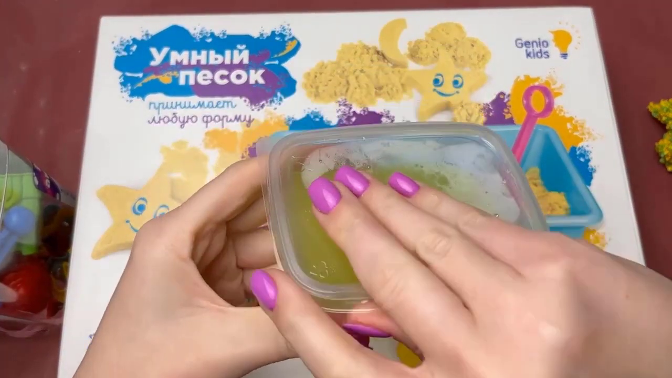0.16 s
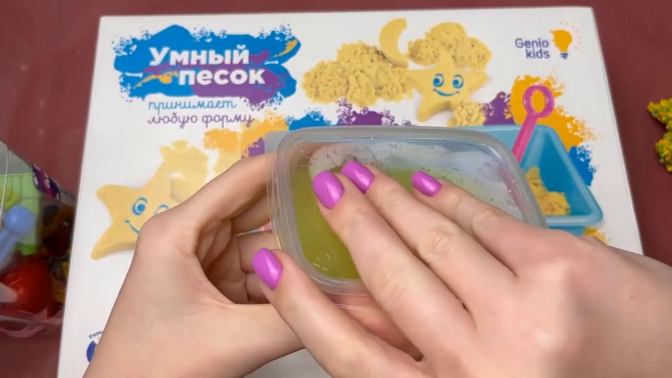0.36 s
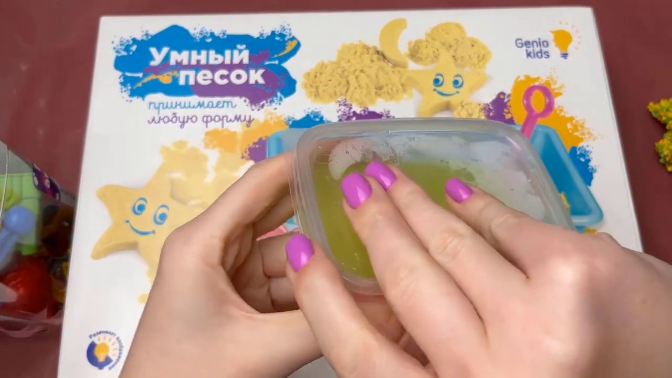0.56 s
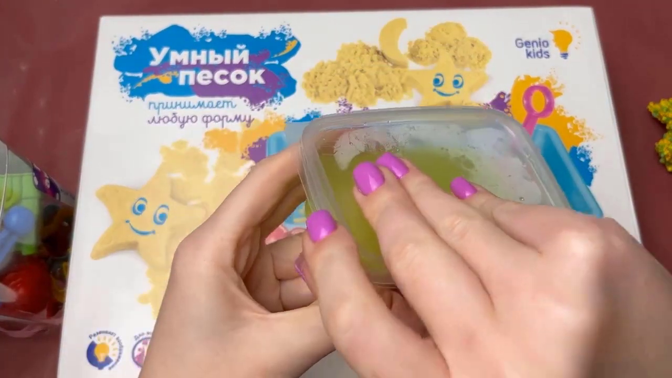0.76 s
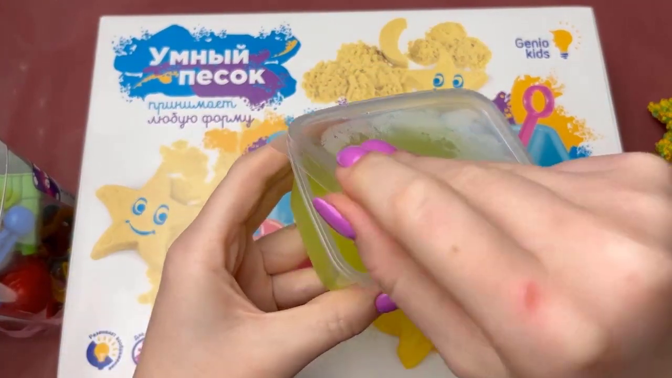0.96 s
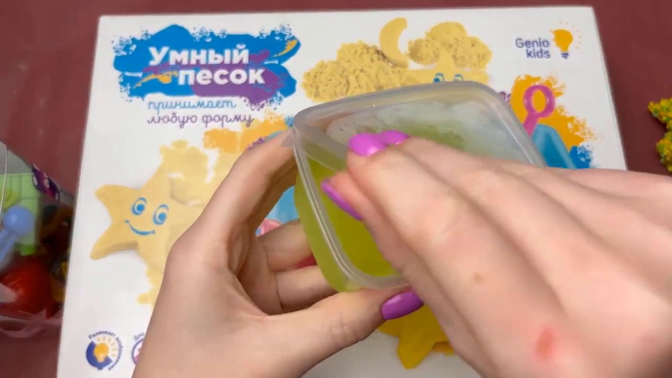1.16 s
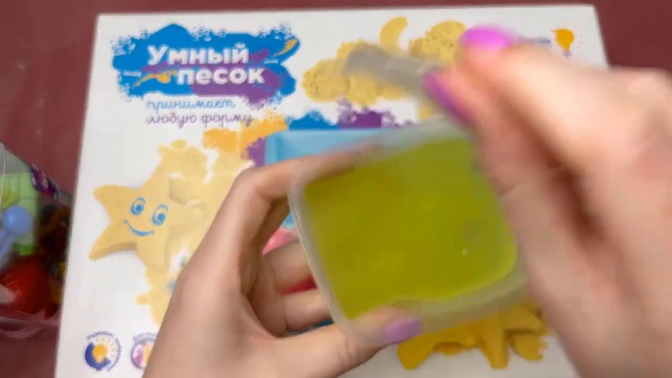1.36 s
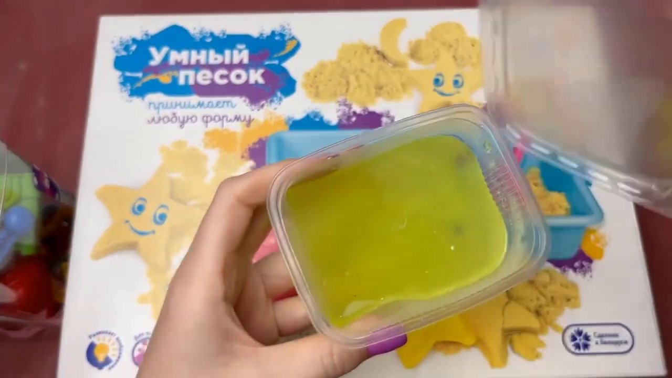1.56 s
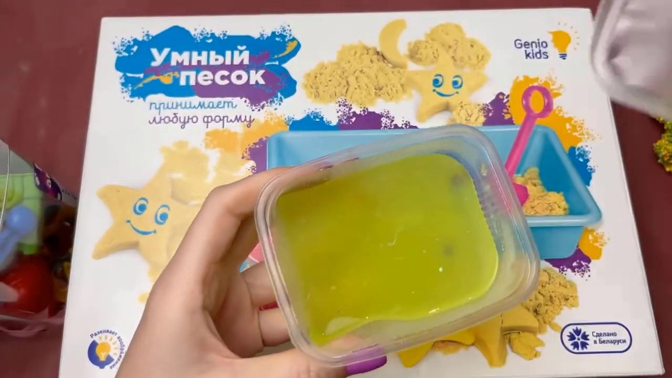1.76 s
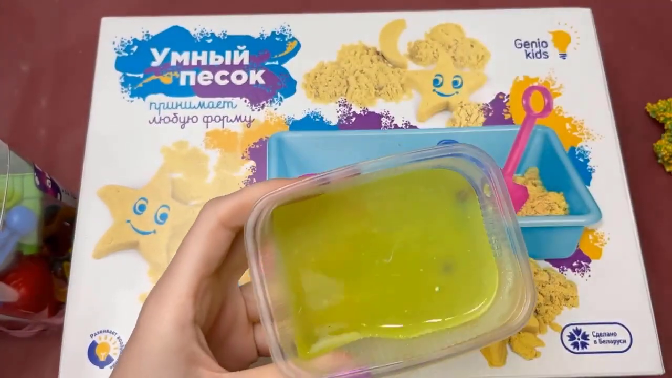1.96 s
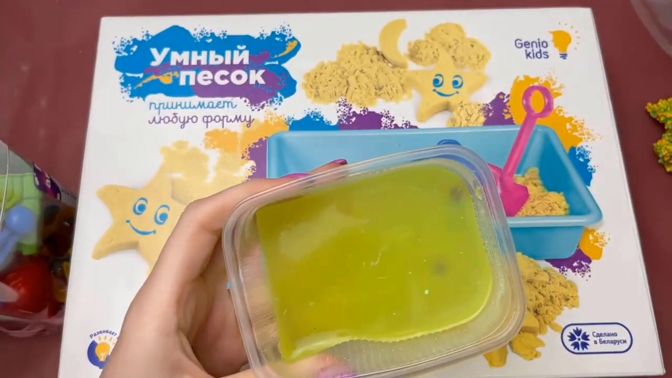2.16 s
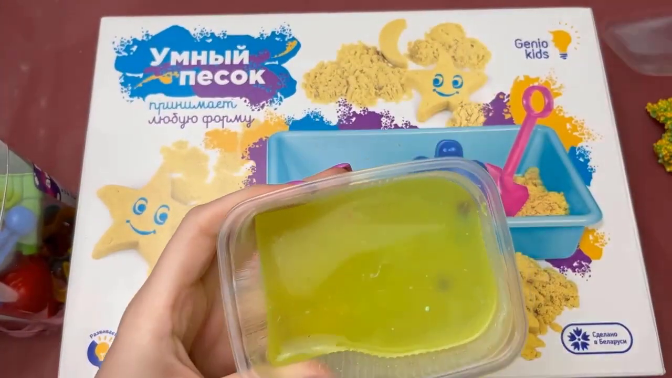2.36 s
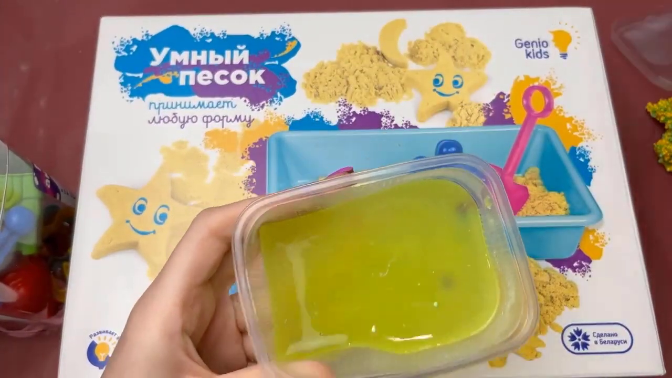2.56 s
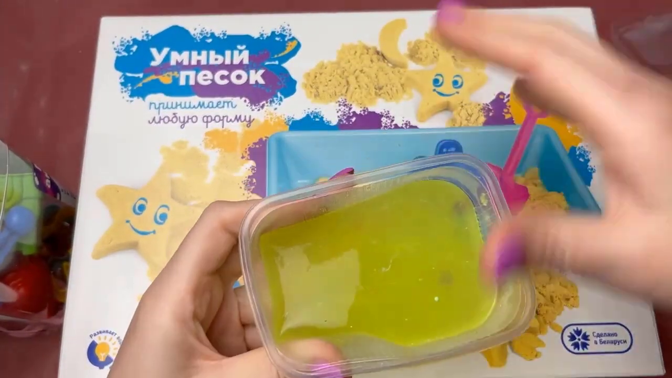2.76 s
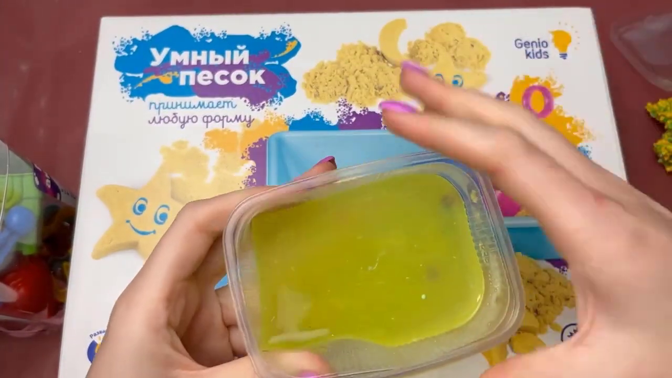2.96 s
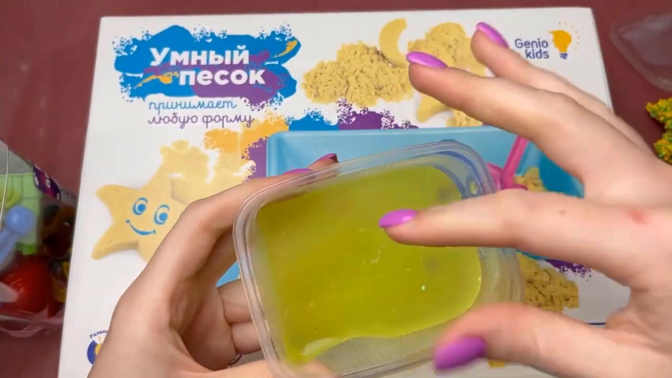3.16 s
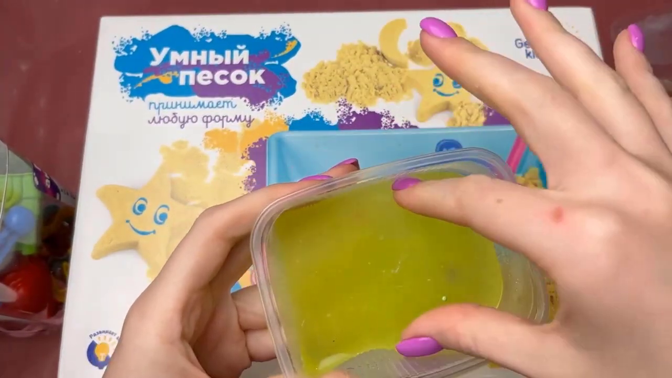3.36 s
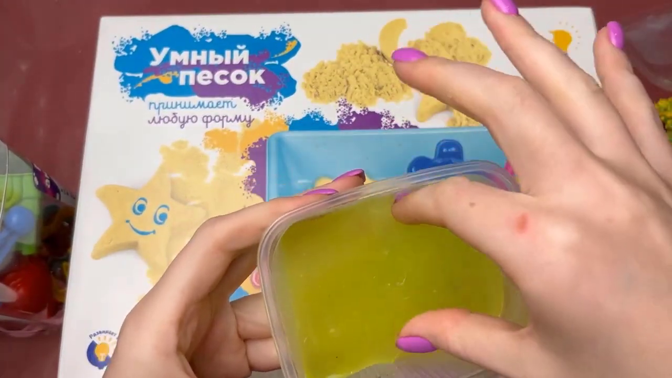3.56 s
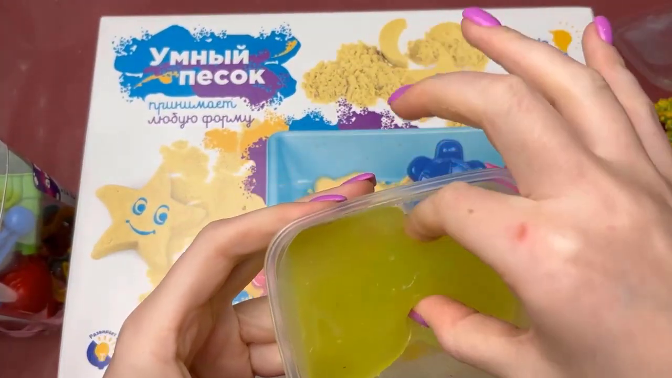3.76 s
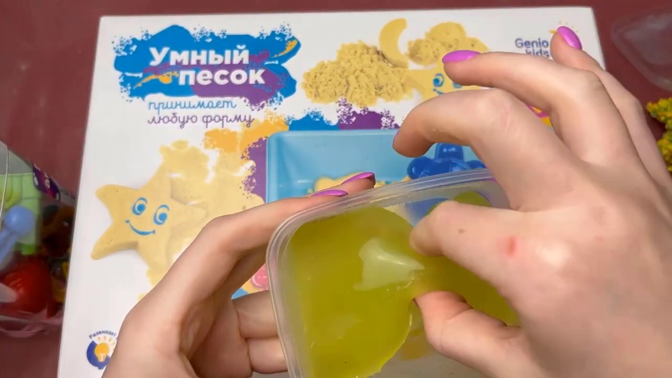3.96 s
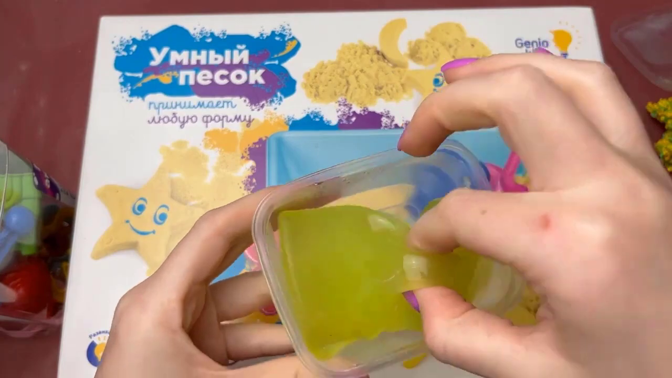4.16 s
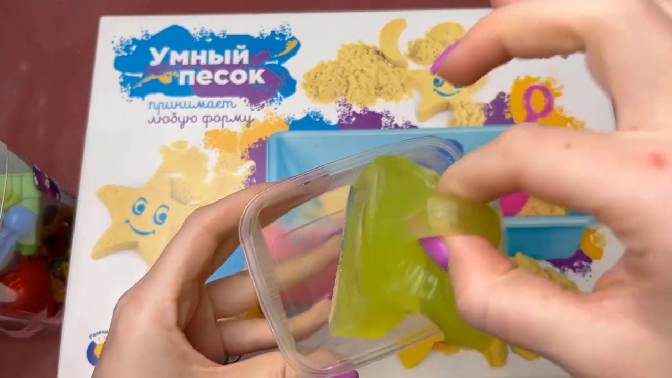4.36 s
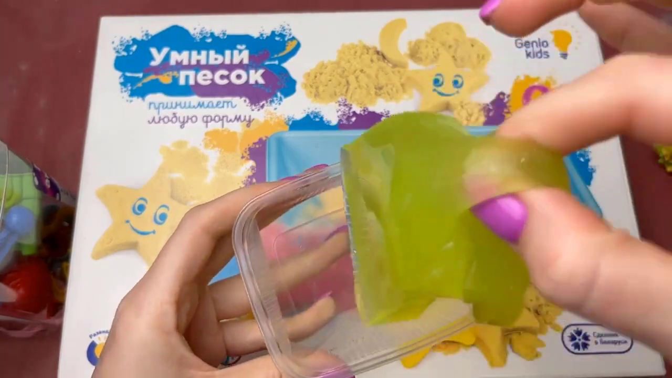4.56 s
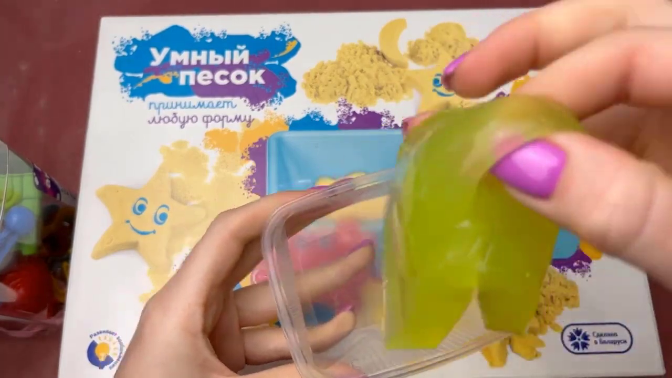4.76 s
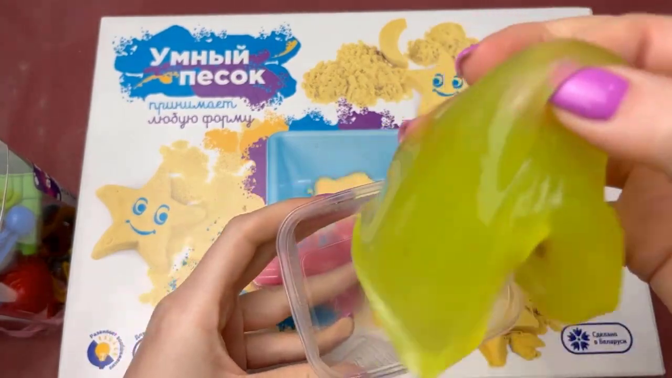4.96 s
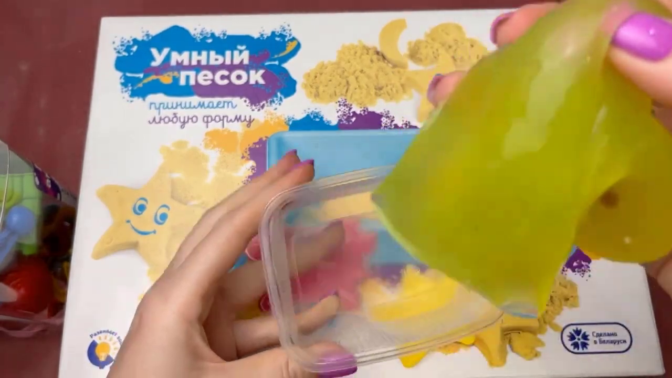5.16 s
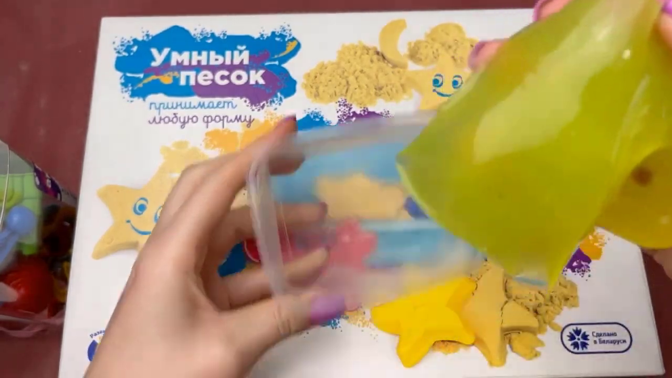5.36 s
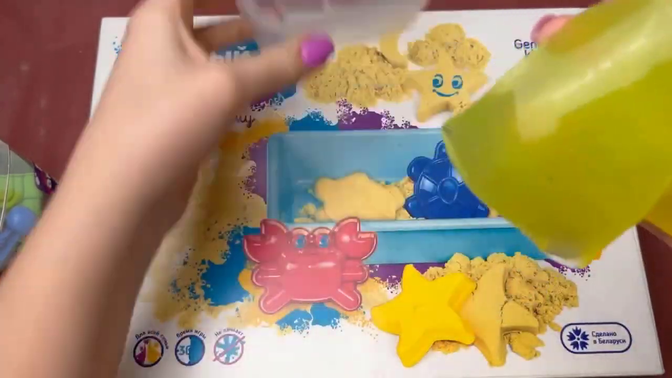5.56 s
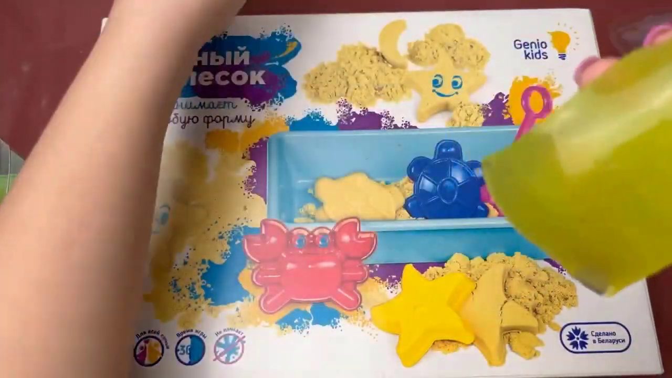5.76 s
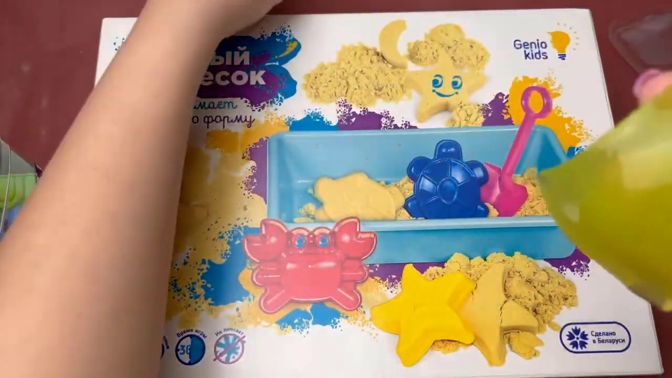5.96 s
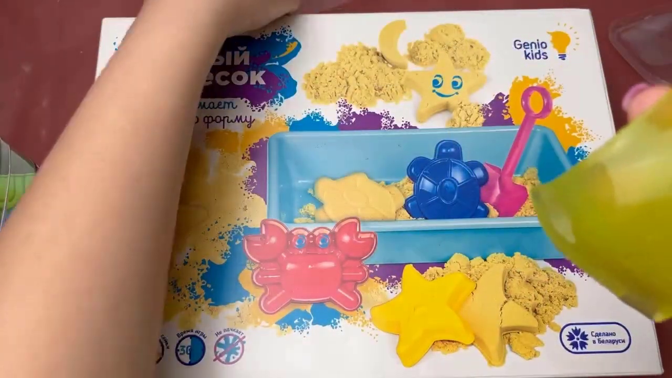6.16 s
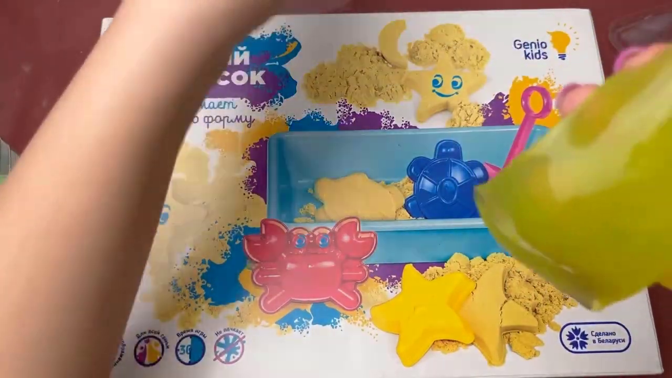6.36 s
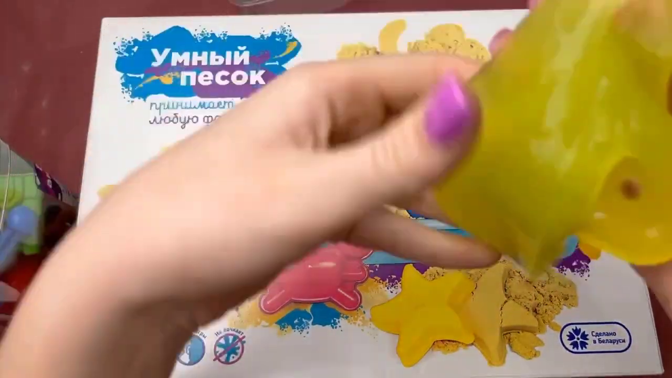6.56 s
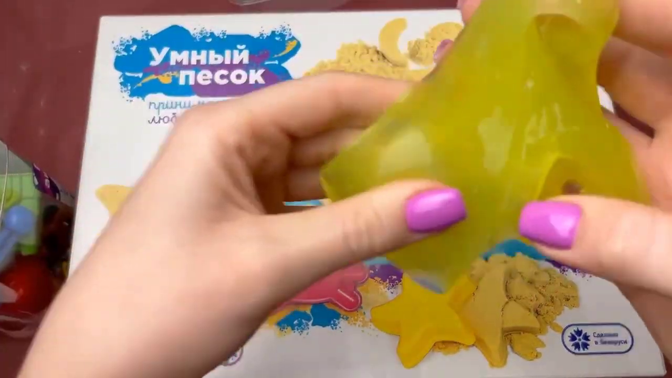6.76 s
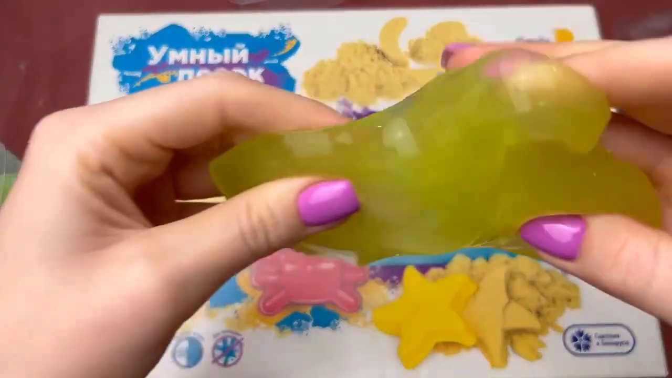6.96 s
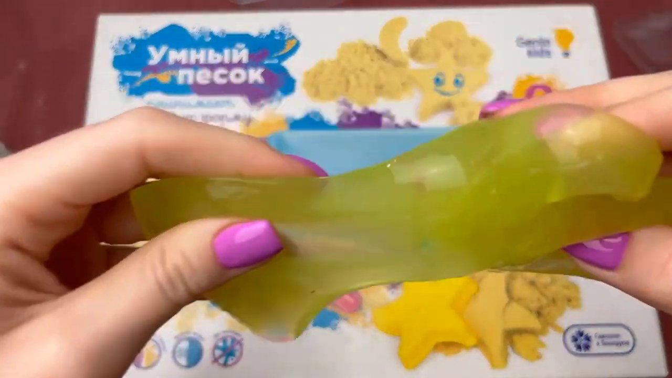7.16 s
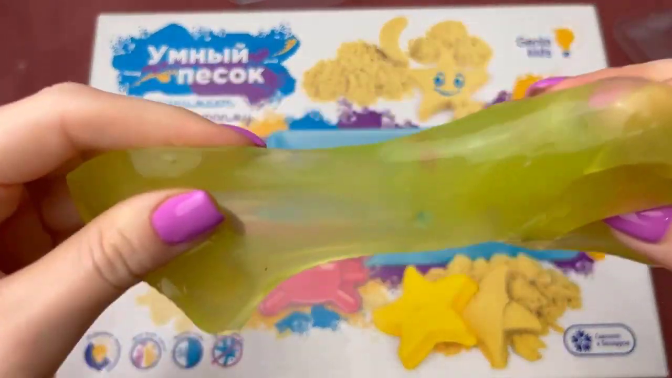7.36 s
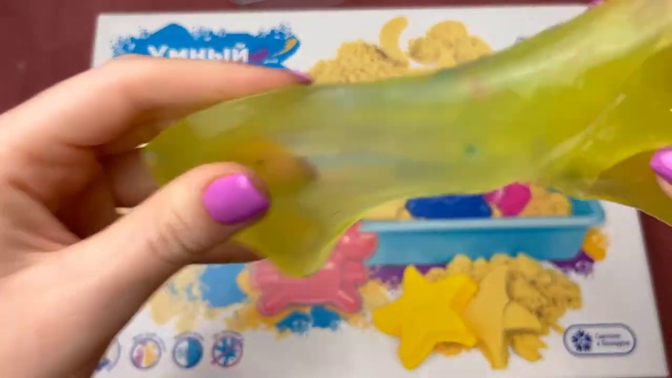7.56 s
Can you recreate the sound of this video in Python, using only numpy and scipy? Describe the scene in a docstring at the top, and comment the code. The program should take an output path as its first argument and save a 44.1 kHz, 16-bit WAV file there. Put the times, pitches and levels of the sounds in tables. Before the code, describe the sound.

A quiet furnished room hums steadily, heavy in the bass, under close phone-recorded handling of a small plastic tub. From 0.1 s the rim gives dry clicks, with a stronger one at 0.43 and faint ticks around it. A loud hollow snap lands at 0.75, then a hard cluster at 0.93-1.0, with a lesser click at 1.18. At 1.39-1.53 the lid tears free in rapid, distorting snaps, creaks and loose plastic chatter, ending with a low thump and a short scrape. A faint whine bends up and down near 1.9; the lid taps down farther off, clearest at 2.4. A barely audible tone lingers around 2.8-3.4. Jelly peels with small ticks from 3.4 to 4.6, a sharper click at 5.2 and light ones at 5.47. The tub knocks down at 6.1-6.3 with a bright clack, rattle and thump, and a soft tap at 6.48. Mostly hum remains, with minute ticks near 6.85 and 7.3.

```python
"""Under all of it hums a quiet furnished room, steady and heavy in the bass, made of shaped noise.
Hands work the lid off a small plastic tub close to a phone: the rim snaps free in steps, each a short burst
of wall tone, crack noise and low modes, and creaks between them as dense slips shaped by the tub.
Low thumps are short sine packets; a faint gliding whine, then a faint steady hum tone, are sines. The lid is
put down further off, jelly peels with small ticks, the tub is put down; the loudest snaps overload the recorder."""
import sys
import numpy as np
from scipy import signal
from scipy.fft import rfft, irfft
from scipy.io import wavfile

SR = 44100
rng = np.random.default_rng(int(sys.argv[2]) if len(sys.argv) > 2 else 0)


def dump_mix(stems):
    """Bounce the given channels to the path in sys.argv[1] as a 16-bit WAV at rate SR."""
    frames = np.atleast_2d(stems).T  # one column per channel
    limited = np.clip(frames, -1, 1)  # hard clip at full scale
    pcm = np.round(limited * 32767).astype(np.int16)
    wavfile.write(sys.argv[1], SR, pcm)


N = 335160

# Likeness of left and right. Each row: frequency in Hz, correlation from -1 to 1.
LIKENESS = [(60, 0.96), (180, 1), (550, 0.31), (1650, 0.27), (4960, -0.22), (15000, 0.18)]

# Spectrum of the room hum. Each row: frequency in Hz, relative density in dB per Hz.
HUM_SPECTRUM = [(12, -50), (20, -25.5), (37, -5.5), (102, -3.5), (126, -6), (236, -9.5), (270, -9.5),
                (384, -10.5), (608, -12), (776, -16), (1100, -16), (2150, -27), (2750, -39.5), (3600, -41),
                (5170, -33), (5920, -62), (7560, -40.5), (9400, -50), (10200, -70), (13000, -83)]
# Wavering tones in the hum. Each row: frequency in Hz, width in Hz, mean level in dB.
HUM_TONES = [(211.4, 89, -48), (229, 22, -57), (367, 29, -58.5), (523, 120, -52.5), (769, 7.1, -61),
             (3478, 210, -71)]
HUM_DB, TONE_WAVER_DB = -46, 2.2   # mean level of the broad hum; spread of the tone levels

# Strokes of plastic and jelly sliding. Each row: start of the loudest part in seconds, relative level in dB,
# rise in seconds, hold in seconds, fall in seconds, extra treble in dB. Rise and fall span 20 dB.
STROKES = [(0.098, -40, 0.028, 0.01, 0.015, 6.5), (0.385, -52.5, 0.097, 0.025, 0.076, 0),
           (0.515, -44, 0.083, 0.0075, 0.19, 13.5), (0.776, -22.5, 0.0038, 0.0007, 0.0033, -6),
           (0.921, -35, 0.063, 0.035, 0.044, 1.5), (0.968, -26, 0.0056, 0.00076, 0.013, -7.5),
           (0.989, -26, .016, 0.0091, 0.13, -6.5), (1.387, -25, 0.0057, .001, 0.013, -2.5),
           (1.446, -20, 0.036, 0.004, 0.048, -3), (1.546, -28, 0.08, .024, 0.15, 6),
           (1.796, -41.5, 0.026, .001, 0.012, 5), (2.074, -54, 0.071, 0.026, .12, 17.5),
           (2.27, -57, 0.024, .001, 0.14, 8.5), (2.48, -41.5, 0.06, 0.029, 0.13, 7.5),
           (3.007, -54, 0.065, .001, .08, 0), (3.396, -49.5, .033, 0.061, 0.076, 3),
           (3.545, -49, 0.068, 0.022, 0.078, 14), (3.872, -37, 0.022, 0.004, 0.057, -12),
           (4.166, -43.5, 0.011, 0.19, 0.055, -2), (4.336, -49, 0.0069, .006, 0.022, 6),
           (5.203, -39, 0.024, .012, 0.092, 4.5), (5.856, -56, 0.064, 0.0012, 0.064, 7),
           (6.13, -44, 0.04, 0.14, 0.11, -1), (6.245, -14.5, 0.0059, 0.0015, 0.017, -4),
           (6.337, -35, 0.24, 0.03, 0.16, -4.5), (6.54, -50.5, 0.081, 0.0017, 0.056, -2),
           (6.847, -60, 0.022, 0.14, 0.034, 4.5), (7.31, -47.5, 0.026, 0.022, 0.043, -1.5)]
# Spectrum of sliding. Each row: frequency in Hz, relative density in dB per Hz.
SLIDE_SPECTRUM = [(290, -33), (500, -2), (4720, -15.5), (5900, -14.5), (6590, -19.5), (7900, -22.5),
                  (9480, -24.5), (10000, -44), (11500, -27.5), (14000, -103.5)]
TREBLE_HZ = 6000   # where the treble of a stroke begins

# The rim slips free in steps. Each row: start in seconds, level in dB, settled wall pitch in Hz, length in ms,
# then in dB relative to the level: crack, hollow modes, room send.
RIM_SNAPS = [(0.101, -13, 1190, 1.15, -41, -14, -28), (0.292, -47, 826, 2.5, -14, 4, -21),
             (0.342, -30.5, 1280, 2.6, -16, 2.5, -19.5), (0.216, -50.5, 1410, 2.3, 0.5, -15, -16),
             (0.306, -42.5, 1400, 2.5, -12, -10, -18), (0.392, -39, 1000, 3, -8, 0, -14),
             (0.434, -9, 1476, 1.4, -44, -14.5, -22.5), (0.435, -16, 1080, 4.5, -56, 11, -17.5),
             (0.532, -37, 1090, 3.1, -9, 1.5, -13), (0.585, -39.5, 1020, 11, -5.5, -24, -12),
             (0.743, -21, 1100, 3, -10.5, 1, -22), (0.7455, -1, 1080, 3, -13, 0, -14.5),
             (0.746, 1, 636, 5.2, -31.5, -3.5, -14.5), (0.934, -14.5, 1410, 1.8, -19, -6.5, -17),
             (0.939, -10, 1370, 1.7, -31.5, -11.5, -14), (0.968, -22.5, 950, 2.5, -11, -9.5, -19),
             (0.972, 5.5, 1667, 1.37, -25.5, -32.5, -15.5), (0.991, 0, 1130, 3.1, -25, -5.5, -17.5),
             (1.003, 1, 1236, 2.64, -36.5, -17, -33.5), (1.181, -19.5, 1307, 3, -26.5, -8.5, -15),
             (1.387, -16.5, 1101, 2.5, -14, -7.5, -20.5), (1.39, 4.5, 1086, 3.7, -12, -5, -10.5),
             (1.394, -13, 1010, 2.3, -20, -12, -24.5), (1.401, -6, 930, 6.8, -21, -12, -24.5),
             (1.411, -17.5, 1380, 4, -9, -12, -13.5), (1.421, 0, 1420, 5.5, -12, -10, -22),
             (1.456, 3.5, 1395, 2.9, -9.5, -21.5, -16.5), (1.4603, 2, 1405, 3.2, -13.5, -17, -20),
             (1.466, -7.5, 1430, 4.2, -10, -13.5, -24.5), (1.464, -6.5, 1500, 2.5, -9.5, -20.5, -22.5),
             (1.486, -13.5, 1347, 3.5, -22, -23, -20.5), (1.496, -16.5, 1358, 3.4, -21.5, -25.5, -8.5),
             (1.506, -20.5, 1387, 4.8, -20, -15.5, -21.5), (1.517, -19, 1360, 4, -13, -17.5, -22),
             (1.527, 1.5, 1106, 3.35, -7.5, -4, -19), (1.533, -15, 1149, 3.7, -0.5, -11.5, -22)]
RIM_BODY_DB, RIM_THUMP_DB = -21, -27.5
# The near corner is worked first, then the lid tears off; pan is left over right.
RIM_PAN_DB, LID_FREE_S, FREE_PAN_DB = -1.5, 1.3, 3
# Lid and tub are put down and rock. Each row: start in seconds, level in dB, settled wall pitch in Hz,
# length in ms, then in dB relative to the level: crack, hollow modes, body modes, room send.
KNOCKS = [(1.929, -33.5, 1399, 3.5, -3.5, 6.5, -15, -14), (2.392, -16, 1868, 0.9, -5.5, -12, -19, -9.5),
          (2.679, -37.5, 1350, 4, -39, -6.5, -15.5, -8), (6.064, -24.5, 830, 5.5, -61, -0.5, -19, -6),
          (6.135, -13.5, 855, 8.7, -10, -1, -1, -7), (6.245, -17.5, 1042, 0.71, 0.5, 3, 5, -15.5),
          (6.257, -19, 917, 5.5, -30.5, 5, -32, -7), (6.285, -32, 1032, 1.3, -31, 6, 3.5, -1.5),
          (6.476, -31.5, 1340, 2.7, -16.5, 0, -3, -8.5)]
KNOCK_THUMP_DB, KNOCK_PAN_DB = -17, -2.5
# Jelly lets go of the wall. Each row: start in seconds, level in dB, settled wall pitch in Hz, length in ms,
# then in dB relative to the level: crack, hollow modes, room send.
TICKS = [(3.393, -18.5, 1326, 1.83, -30, -3, -16), (3.46, -21, 1350, 2.8, -18, -4.5, -16.5),
         (3.658, -29.5, 1450, 3.3, -17.5, -19, -16.5), (3.868, -30.5, 1438, 2.8, -22, -1, -18),
         (3.874, -30, 1230, 4.5, -10.5, -8, -17.5), (4.098, -35.5, 1470, 2.7, -15.5, -1, -3),
         (4.137, -18.5, 1437, 2, -8.5, -2, -16.5), (4.165, -34, 1180, 3.2, -10, -12, -9),
         (4.227, -39, 1120, 2.9, -10, -12, -14), (4.297, -40, 1690, 2, -6, -14, -6),
         (4.317, -35, 1436, 2.5, -12, -10, -17), (4.198, -33.5, 1154, 4.8, -10, -7.5, -13),
         (4.262, -27, 1222, 6.2, -12, -24, -8), (4.272, -31.5, 1470, 4.8, -8.5, -21, -11),
         (4.345, -32.5, 1440, 6, -3, -18, -21), (4.611, -36, 1430, 2.5, -18, -6, -7),
         (5.192, -36, 1696, 2.7, -17, -18, -5), (5.205, -8.5, 1445, 1.34, -24, -7.5, -22),
         (5.224, -36, 1243, 2.6, -33.5, 7, -16), (5.468, -20.5, 1802, 3.1, -12, -25, -19.5),
         (5.47, -23.5, 1410, 3.9, -20, -20, -20), (6.845, -60, 7200, 4.3, -20, -34, -19),
         (7.291, -48, 6760, 1.2, -5, -36, -10), (7.322, -61, 7800, 1.3, -14.5, -30.5, -13)]
TICK_BODY_BELOW_DB, TICK_THUMP_DB = 13, -45   # the body rings below the hollow
# Modes of the flexed wall. Each row: multiple of the pitch, relative level in dB.
WALL_MODES = [(0.999, 1), (1.45, -12), (2.1, -17.5)]
# Spectrum of the crack. Each row: frequency in Hz, relative density in dB per Hz.
CRACK_SPECTRUM = [(350, -16), (600, -7.5), (2640, -6), (3060, -8), (4790, -14), (5960, -9), (6730, -11),
                  (9070, -19), (10100, -20.5), (11700, -22.5), (15400, -95.5)]
# Low modes of the tub in three clusters: hollow, body, thump.
# Each row: settled frequency in Hz, level within the cluster in dB, 60 dB decay time in seconds.
TUB_MODES = [
    [(484, -8.5, 0.022), (548, 3, 0.022), (630.4, 4, 0.02), (690, -9, 0.018), (1007, -1, 0.015)],
    [(223, -1, 0.068), (266.5, -4.5, 0.1), (338.2, -7, 0.18), (362.1, 3, 0.052), (446, -11, 0.033)],
    [(83.6, -11.5, 0.099), (123, -1, 0.12)],
]
GRIP_DB, GRIP_SHIFT = 2.2, .02   # spread of mode strength and relative pitch from grip to grip

# Decay of the room. Each row: frequency in Hz, 60 dB decay time in seconds (0.03 at the least).
ROOM_T60 = [(100, 1), (400, 0.048), (1200, 0.45), (3000, 0.52), (8000, 0.25), (14000, 0.058)]
# Colour of the room tail. Each row: frequency in Hz, gain in dB.
ROOM_COLOUR = [(100, -1.5), (500, 4), (800, -4), (1100, -3), (1500, -2.5), (1950, -5), (2400, -4),
               (2900, -4), (4000, -1.5), (4700, 2), (6200, -12), (8000, 2.5), (12000, -4)]
# Phase gap of the microphone ports. Each row: frequency in Hz, lead of the left port in radians.
PORT_PHASE = [(200, 0), (450, -.5), (900, -.75), (1400, -.2), (1800, -.1), (2670, 2.6), (4130, .4),
              (5000, .7), (5600, 3.1), (6550, 3.3), (7320, 6.3), (8870, 6.5), (9650, 9.5), (10900, 9.4),
              (12100, 13), (15200, 19)]

# Bursts of chatter. Each row: start of the loudest part in seconds, level in dB,
# rise in seconds, hold in seconds, fall in seconds. Rise and fall span 20 dB.
CHATTER = [(0.445, -39, 0.012, 0.013, 0.027), (1.005, -41, 0.013, 0.012, 0.089),
           (1.414, -21, 0.0094, 0.0045, 0.014), (1.438, -22.5, .008, 0.016, 0.008),
           (1.48, -26.5, 0.009, 0.033, 0.0088), (1.553, -27, 0.018, 0.013, 0.16),
           (4.262, -45, 0.011, 0.019, 0.077), (5.224, -38.5, 0.0063, 0.018, 0.017),
           (6.255, -28, 0.015, 0.0088, 0.036), (6.3, -30, 0.032, 0.014, 0.029)]
# Modes of the loose wall. Each row: frequency in Hz, relative level in dB, 60 dB decay time in seconds.
LOOSE_WALL_MODES = [(830, -9, 0.015), (1104, -2.5, 0.039), (1180, -6.5, 0.023), (1470, 4, 0.017),
                    (1810, -5, 0.068), (2300, -11, .025), (2550, -7.5, 0.018), (4630, -19, .012)]
CHATTER_PER_S = 400   # typical rate of slips

# Low thumps of the tub and lid. Each row: centre in seconds, level in dB, frequency in Hz.
LOW_THUMPS = [(1.119, -32, 68.6), (1.252, -29.5, 52.7), (1.404, -19, 118), (1.467, -19, 120),
              (1.541, -8.5, 116.6), (1.938, -29.5, 102), (5.211, -22, 208), (6.293, -18.5, 272.5),
              (6.334, -19.5, 120), (7.349, -32.5, 48.9)]
# A faint gliding whine and a faint steady hum tone.
# Each row: time in seconds, frequency in Hz, mean level in dB.
FAINT_TONES = [
    [(1.835, 600, -62), (1.87, 630, -48), (1.9, 648, -52), (1.93, 665, -45), (1.99, 660, -54),
     (2.06, 620, -50), (2.095, 610, -64)],
    [(2.74, 805, -66), (2.84, 800, -60), (3.36, 797, -60), (3.46, 795, -66)],
]

CUTOFF_HZ = 15600   # stopband edge of the recorder


def from_db(db):
    """Decibels are a logarithm of amplitude ratio; this returns the gain."""
    return 10 ** (np.asarray(db) / 20)


def rms_one(x):
    """Normalisation by power: scale to rms 1."""
    return x / np.sqrt(np.mean(x ** 2) + 1e-20)


def at_hz(points, hz):
    """Linear interpolation on a log-frequency axis."""
    f, v = np.transpose(points)
    return np.interp(np.log(np.maximum(hz, 1)), np.log(np.maximum(f, 1)), v)


def coloured(x, spectrum):
    """Linear filtering: multiply the spectrum of x by a gain curve in dB."""
    size = x.shape[-1]
    gain = from_db(at_hz(spectrum, np.fft.rfftfreq(size, 1 / SR)))
    return irfft(rfft(x) * gain, size)


def drift(rate_hz):
    """Low-passed chance: noise through two equal poles at rate_hz wanders slowly with rms 1."""
    step = 40   # samples between the computed points
    r = np.exp(-2 * np.pi * rate_hz * step / SR)
    white = rng.standard_normal(N // step + 2002)
    slow = rms_one(signal.lfilter([1], [1, -2 * r, r * r], white)[2000:])
    return np.interp(np.arange(N) / step, np.arange(len(slow)), slow)


def left_right(mid, side, hz):
    """Partial coherence: the balance of shared and opposed noise sets the left-right correlation."""
    alike = np.clip(at_hz(LIKENESS, hz), -1, 1)
    return np.sqrt(1 + alike) * mid + np.sqrt(1 - alike) * side * [[1], [-1]]


def stereo_noise():
    """A diffuse field: spectra of two white noises whose likeness varies with frequency, and their Hz."""
    mid, side = rfft(rng.standard_normal((2, N)))
    hz = np.fft.rfftfreq(N, 1 / SR)
    return left_right(mid, side, hz), hz


def hum():
    """Stationary noise, heavy in the bass, with narrow bands whose random phases make wavering tones."""
    noise, hz = stereo_noise()
    broad = rms_one(irfft(noise * from_db(at_hz(HUM_SPECTRUM, hz)), N))
    out = broad * from_db(HUM_DB + drift(24.0))
    noise, hz = stereo_noise()
    for f, width, db in HUM_TONES:
        resonance = 1 / (1 + (2 * (hz - f) / width) ** 2)
        tone = rms_one(irfft(noise * resonance, N))
        out = out + from_db(db + TONE_WAVER_DB * drift(0.92)) * tone
    return out


def stroke_gain(strokes):
    """Exponential envelopes: each stroke rises, holds and falls along straight lines in dB."""
    t = np.arange(N) / SR
    total = 0
    for s, db, rise, hold, fall in strokes:
        before = np.maximum((s - t) / max(rise, .003), 0)
        after = np.maximum((t - s - hold) / max(fall, .005), 0)
        total = total + from_db(db - 20 * before - 20 * after)
    return total


def slips(per_s, spread_db, clump_db):
    """Stick-slip as a random point process: clicks of uneven size that come in clumps."""
    sizes = from_db(spread_db * np.minimum(rng.exponential(1, N), 5)) * rng.choice([-1, 1], N)
    chance = per_s * from_db(clump_db * drift(60)) / SR
    return sizes * (rng.random(N) < chance)


def creak():
    """Stick-slip friction: dense uneven slips coloured by the tub, with treble set stroke by stroke."""
    rub = from_db(-3.5) * rms_one(coloured(slips(2800, 3.0, 3.5), SLIDE_SPECTRUM))
    lowpass = signal.butter(4, TREBLE_HZ, fs=SR, output="sos")
    dull = signal.sosfiltfilt(lowpass, rub)
    plain = [row[:-1] for row in STROKES]
    bright = [(s, db + treble_db, *shape) for s, db, *shape, treble_db in STROKES]
    return stroke_gain(plain) * dull + stroke_gain(bright) * (rub - dull)


def contacts():
    """Superposition of snaps, knocks and ticks: (s, dB, Hz, ms, crack, hollow, body, thump, pan, room dB)."""
    rim = []
    for row in RIM_SNAPS:
        pan_db = RIM_PAN_DB if row[0] < LID_FREE_S else FREE_PAN_DB
        rim.append((*row[:6], RIM_BODY_DB, RIM_THUMP_DB, pan_db, row[6]))
    knocks = [(*row[:7], KNOCK_THUMP_DB, KNOCK_PAN_DB, row[7]) for row in KNOCKS]
    ticks = [(*row[:6], row[5] - TICK_BODY_BELOW_DB, TICK_THUMP_DB, 0, row[6]) for row in TICKS]
    return rim + knocks + ticks


def wall_tone(t, hz, length_ms):
    """Tension sets pitch: the wall starts taut, sings a few cycles and sinks in pitch as it relaxes."""
    # fingers choke the wall after the slip, leaving a weak decaying tail
    slip = np.exp(-(t / max(length_ms / 1000, .001)) ** 3) + from_db(-21 - 60 * t / 0.028)
    sag = t + 0.21 * 0.0015 * (1 - np.exp(-t / 0.0011))
    tone = 0
    for multiple, db in WALL_MODES:
        tone = tone + from_db(db) * np.sin(2 * np.pi * multiple * hz * sag + rng.uniform(0, 2 * np.pi))
    return slip * tone


def tub_ring(t, cluster_db):
    """Modal decay: hollow, body and thump modes ring on, each shifted by the grip and gliding down."""
    slack = t + 0.00098 * (1 - np.exp(-t / 0.0021))
    ring = 0
    for level_db, modes in zip(cluster_db, TUB_MODES):
        for f, mode_db, t60 in modes:
            shift, firm = rng.normal(0, 1, 2)
            gain = from_db(level_db + mode_db + GRIP_DB * firm - 60 * t / t60)
            ring = ring + gain * np.sin(2 * np.pi * f * (1 + GRIP_SHIFT * shift) * slack)
    return ring


def snaps():
    """Sudden release of strain excites wall, crack and tub modes; returns the near sound and the room send."""
    t = np.arange(6000) / SR
    dry, send = np.zeros((2, N + len(t))), np.zeros(N + len(t))
    click = coloured(1. * (np.arange(len(t)) == 64), CRACK_SPECTRUM)   # far off, the crack is one sharp front
    click = click / np.linalg.norm(click)
    rise = 1 - np.exp(-(t / 0.00098) ** 2)    # the rim lets go within about a millisecond
    swell = 1 - np.exp(-(t / 0.0023) ** 2)    # low modes start later
    for s, db, hz, length_ms, crack_db, *cluster_db, pan_db, room_db in contacts():
        wall = wall_tone(t, hz, length_ms)
        noise = rms_one(coloured(rng.standard_normal(len(t)), CRACK_SPECTRUM))
        crack = noise * from_db(crack_db + 12.5 - 60 * t / 0.013)
        low = swell * tub_ring(t, cluster_db)
        near = from_db(db) * (rise * (wall + crack) + low)
        # the room gets faster-dying wall and low modes, and the crack as a click
        far = rise * wall * from_db(7.0 - 60 * t / 0.016)
        far = far + low * from_db(4.5 - 60 * t / 0.068)
        far = far + click * from_db(crack_db + 28.5)
        at = int(s * SR) - 20
        dry[:, at:at + len(t)] += near * from_db([[pan_db / 2], [-pan_db / 2]])
        send[at:at + len(t)] += from_db(db + room_db) * far
    return dry[:, :N], send[:N]


def ports(dry):
    """Interchannel phase: near sound meets the two microphone ports with a gap that depends on frequency."""
    turn = np.exp(.5j * at_hz(PORT_PHASE, np.fft.rfftfreq(N, 1 / SR)))
    return irfft(rfft(dry) * np.array([turn, 1 / turn]), N)


def room(send):
    """Reverberation as convolution with noise that dies band by band and differs between the ports."""
    t = np.arange(int(.7 * SR)) / SR
    white, tail = rng.standard_normal((2, 2, len(t))), 0
    edges = 70 * 2 ** np.arange(0, 8.1, .5)   # half octaves in Hz
    for k, (low, high) in enumerate(zip(edges, edges[1:])):
        bandpass = signal.butter(2, [low, high], "band", fs=SR, output="sos")
        mid, side = signal.sosfilt(bandpass, white[k % 2])   # neighbouring bands use separate noise
        hz = np.sqrt(low * high)
        tail = tail + left_right(mid, side, hz) * from_db(-60 * t / max(at_hz(ROOM_T60, hz), .03))
    onset = np.clip((t - .002) / 0.00062, 0, 1)   # first echoes come from the table top
    tail = coloured(tail, ROOM_COLOUR) * onset
    return signal.fftconvolve(send[None], tail * from_db(-24.5), axes=1)[:, :N]


def chatter():
    """Impulsive excitation of resonators: sparser slips ring the loose wall, each with its own mode strengths."""
    clicks, out = slips(CHATTER_PER_S, 2.5, 3.0) + 1e-18, 0
    for hz, db, t60 in LOOSE_WALL_MODES:
        r = from_db(-60 / (max(t60, .004) * SR))   # decay per sample
        w = 2 * np.pi * hz / SR
        struck = clicks * rng.standard_normal(N)
        out = out + from_db(db) * signal.lfilter([0, np.sin(w)], [1, -2 * r * np.cos(w), r * r], struck)
    return stroke_gain(CHATTER) * rms_one(out)


def low_thumps():
    """A wave packet: each thump is about two low cycles under a Gaussian envelope."""
    t = np.arange(N) / SR
    out = 0
    for s, db, hz in LOW_THUMPS:
        envelope = np.exp(-((t - s) * hz / 0.55) ** 2)
        out = out + from_db(db) * envelope * np.sin(2 * np.pi * hz * (t - s))
    return out


def faint_tones():
    """Phase is the integral of frequency: a whine arches up and falls back, then a hum tone stays steady."""
    t, out = np.arange(N) / SR, 0
    for s, hz, db in map(np.transpose, FAINT_TONES):
        level = from_db(np.interp(t, s, db, left=-120, right=-120) + 2.5 * drift(25))
        phase = 2 * np.pi * np.cumsum(np.interp(t, s, hz)) / SR
        left_leads = np.array([[.5], [-.5]])   # radians
        out = out + np.sqrt(2) * level * np.sin(phase + left_leads)
    return out


def scene():
    """Superposition of the near snaps and creaks, their room tail, the hum, the low thumps and faint tones."""
    slide = creak() + chatter()
    dry, send = snaps()
    near = ports(dry + slide)
    tail = room(send + from_db(-12.0) * slide)
    return hum() + near + tail + low_thumps() + faint_tones()


def record(dry):
    """Saturation and band limiting: peaks are flattened near full scale and the top is cut."""
    flat = dry / (1 + np.abs(dry / .98) ** 12) ** (1 / 12)
    return signal.sosfilt(signal.cheby2(16, 30, CUTOFF_HZ, fs=SR, output="sos"), flat)


dry = scene()
out = record(dry)
dump_mix(out)
```